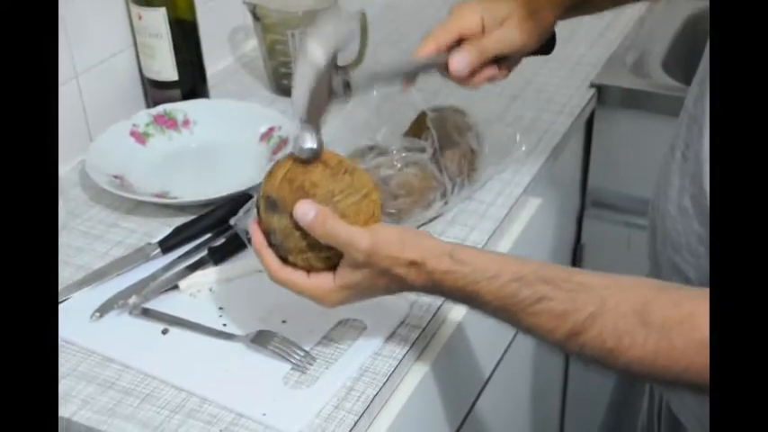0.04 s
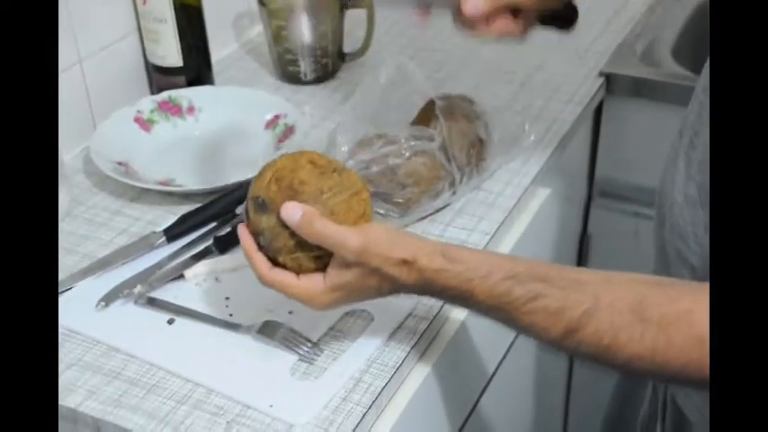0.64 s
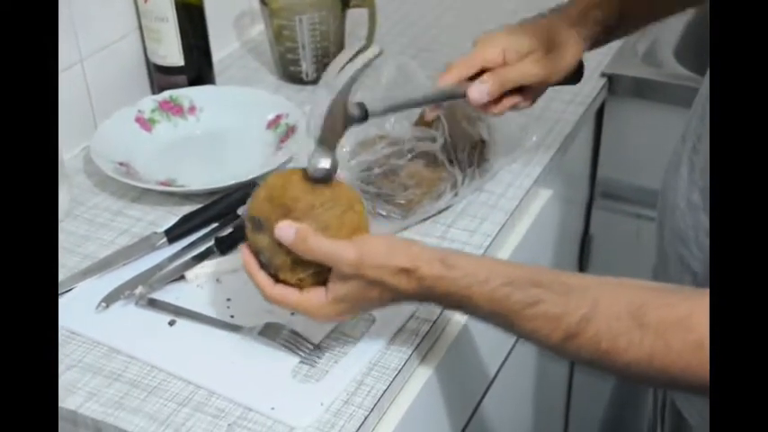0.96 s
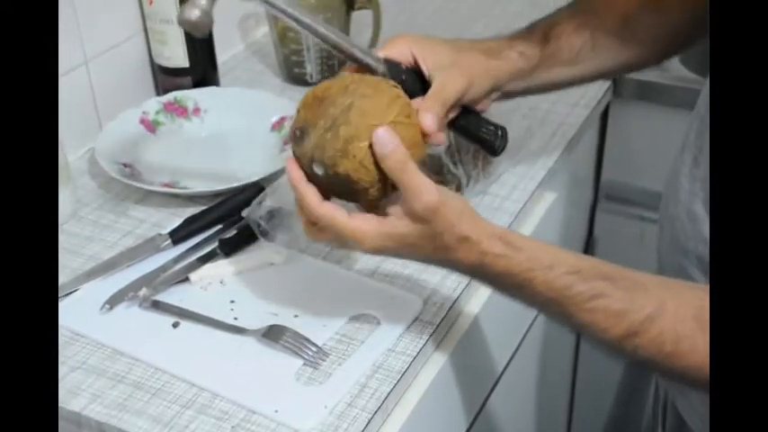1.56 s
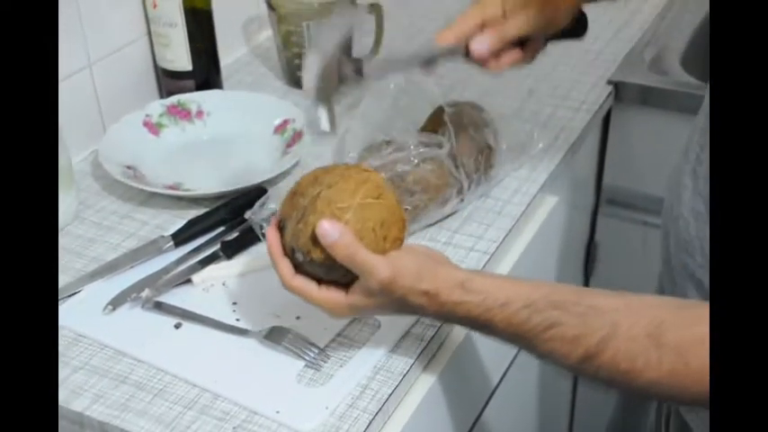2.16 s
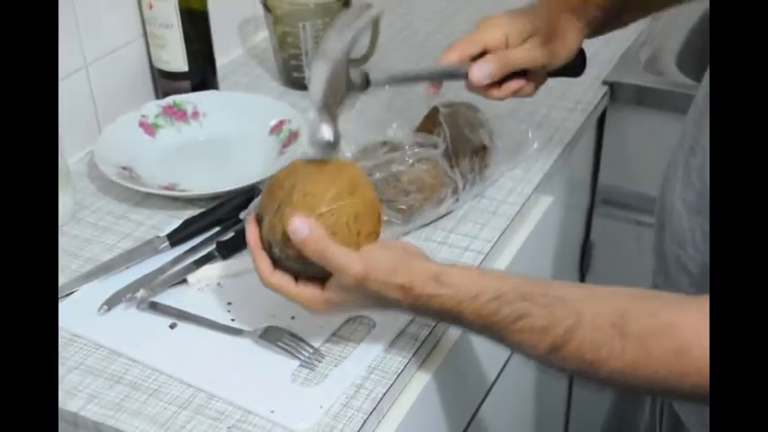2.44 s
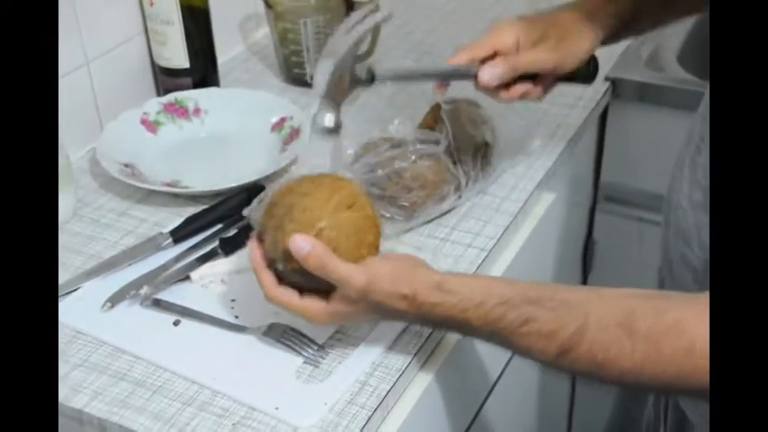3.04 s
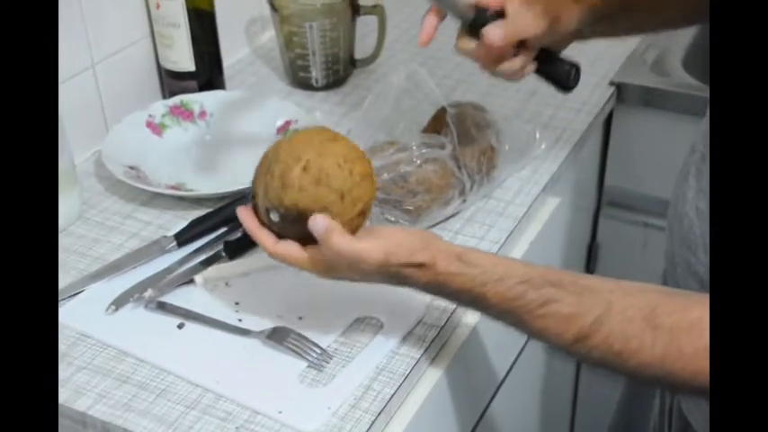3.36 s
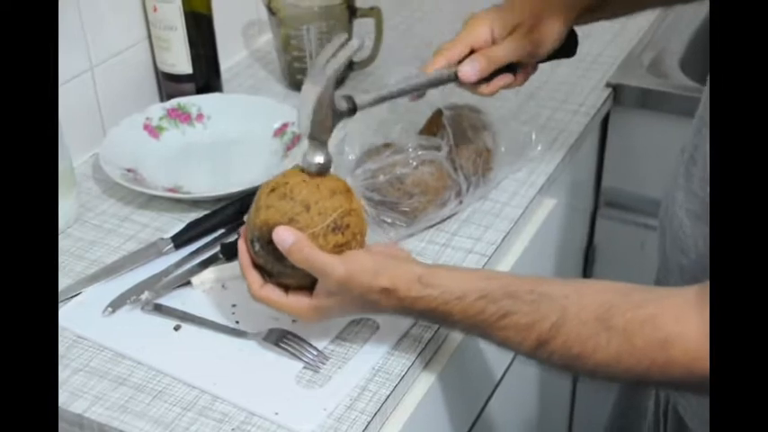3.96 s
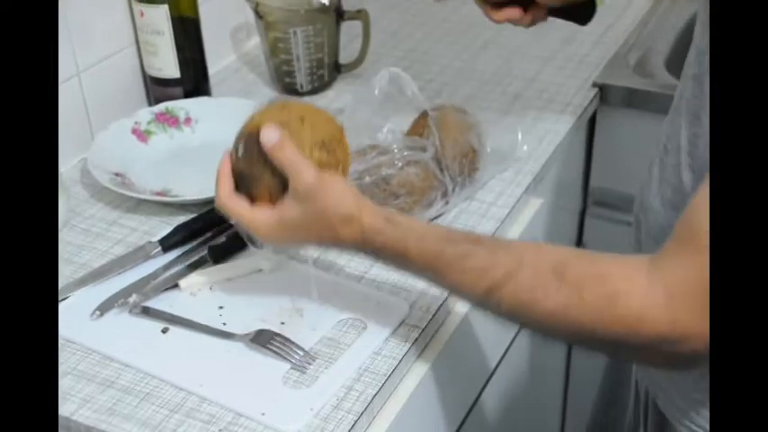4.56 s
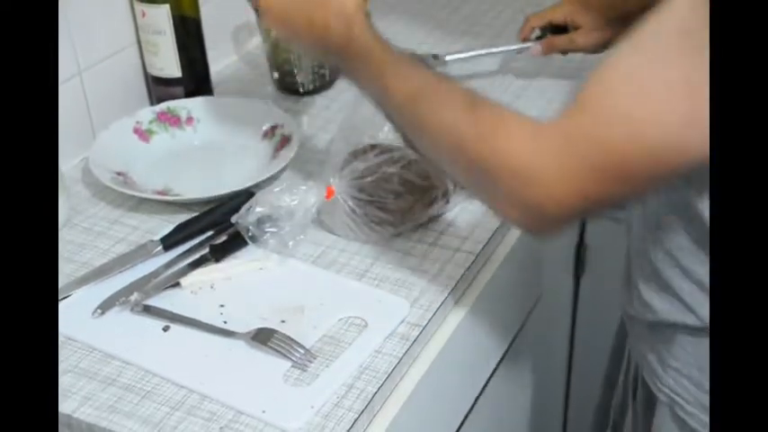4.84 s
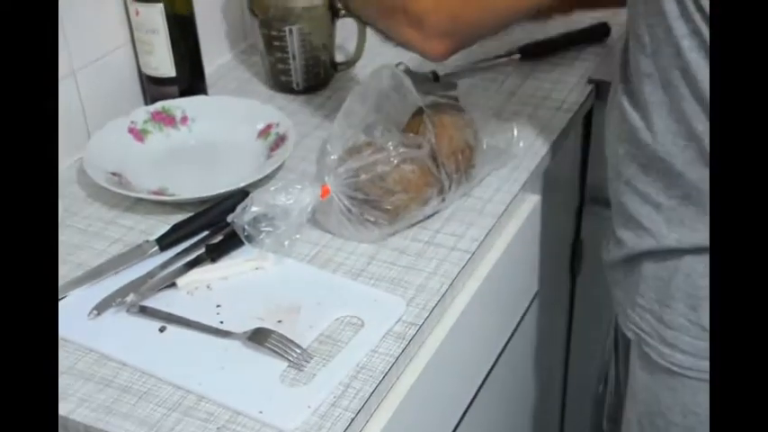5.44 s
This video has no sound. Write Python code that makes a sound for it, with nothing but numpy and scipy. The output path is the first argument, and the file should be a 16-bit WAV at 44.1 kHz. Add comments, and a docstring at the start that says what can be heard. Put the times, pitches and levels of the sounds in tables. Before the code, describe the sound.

A steel hammer strikes a hand-held coconut three times, pauses, strikes three more times, then gives one duller knock. Each blow is a sharp crack with a short hollow ring. Husk and a plastic bag rustle faintly before nut and hammer clatter onto the worktop. An appliance throbs softly in the hard-walled kitchen, and the small, narrow-band microphone overloads on the hardest blows.

```python
"""A hard-walled kitchen. A steel hammer knocks seven times on a hand-held coconut: each blow is a
crack, a hollow ring of the shell and a thump into the palm. Husk and a plastic bag rustle, then nut and
hammer are dumped on the worktop, where the board and a plate ring. An appliance throbs faintly over the
room tone. A small camera's narrow-band microphone hears it all and overloads on the hardest blows."""
import sys
import numpy as np
from scipy import signal
from scipy.fft import rfft, irfft
from scipy.io import wavfile

SR = 44100
rng = np.random.default_rng(int(sys.argv[2]) if len(sys.argv) > 2 else 0)


def unload_wav(signal):
    """Save mono or channel-first audio to the path in sys.argv[1] as 16-bit WAV at rate SR, clipped to [-1, 1]."""
    wavfile.write(
        sys.argv[1],
        SR,
        np.round(np.clip(np.atleast_2d(signal).T, -1, 1) * 32767).astype(np.int16),
    )


N = 247401
AGE = np.arange(SR) / SR  # one second, the life of a blow

# EQ of room tone and microphone hiss: (frequency [Hz], gain [dB])
ROOM_TONE_EQ = [(20, -14), (70, -9.5), (130, -4), (220, 3), (400, 3), (750, -3.5), (1050, -7), (1600, -9),
                (3000, -16), (4800, -14.5), (5400, -24.5)]
# partials of one appliance throb: (frequency [Hz], level [dB], delay [s], length [s])
HUM_PARTIALS = [(379, -44.5, 0, .09), (465, -50, 0, .05), (690, -54, .01, .045)]
# hammer on nut; a square hit clicks harder than a glancing one: (time [s], level [dB], contact
# cut-off [Hz], click [dB], hollow band [Hz], hollow boost [dB], clack band [Hz], push into palm [dB])
HAMMER_HITS = [ (0.066, -22.5, 2760, 11, 934, 10, 2204, -17), (0.4592, -18.5, 4700, 10, 517, 4, 2240, -23),
               (0.909, -19, 4750, 17.5, 580, 7, 2610, -3), (2.0639, -20.5, 4700, 8, 779, 7.5, 3116, 4),
               (2.4380, -19.5, 4900, 19, 618, 11.5, 4200, -8.5),
               (2.9874, -20.5, 5200, 15, 636, 13.5, 2914, -10.5), (3.956, -25, 925, 3, 560, 3, 3055, -5.5)]
# EQ of a hammer hit: (frequency [Hz], gain [dB])
HIT_EQ = [(40, -24), (100, -27), (200, -3.5), (450, 3), (800, 4), (1300, 0), (2500, -2), (4000, -5),
          (5500, -10.5)]
# bright bending modes of the hard shell: (frequency [Hz], level [dB], t60 [s])
CLACK_MODES = [(1020, -8, 0.32), (1313, -9.5, 0.4), (1460, -10.5, 0.42), (1675, -11.5, .35),
               (1980, -3, 0.12), (2237, -3.5, 0.33), (2340, -8.5, 0.16), (2880, -6, 0.2), (2900, -9, 0.21),
               (3117, -8.5, .3), (3564, -11.5, .28), (4043, -11, 0.34), (4700, -7.5, .22)]
# dull give of the hand under the nut: (frequency [Hz], level [dB], t60 [s])
PALM_MODES = [(134, -5, 0.13), (167.8, -1, 0.1), (224.2, -5.5, .18)]
# the whole nut bouncing in the palm: (frequency [Hz], level [dB], t60 [s])
THUMP_MODES = [(274.6, -2.5, 0.15), (303, -9, 0.087), (394.5, -14, 0.42)]
# hollow ring of the shell: (frequency [Hz], level [dB], t60 [s])
SHELL_MODES = [(515.6, -4.5, 0.45), (536, -9.5, 0.42), (583, -4.5, 0.49), (598, -0.5, 0.31),
               (598, -7.5, 0.17), (658, -10, .26), (713, -1, 0.23), (752, -8.5, 0.45)]
# stretches where the fingers turn the nut: (start [s], end [s])
FUMBLE_SPANS = [(1.3, 1.85), (4.3, 5.0)]
# clearest rustles of husk and bag: (time [s], level [dB], length [s], centre [Hz])
CLEAR_RUSTLES = [(1.67, -54.5, 0.048, 4000), (4.519, -52.5, 0.091, 1593), (4.901, -52.5, 0.038, 3460),
                 (5.544, -53, 0.062, 4200)]
# landings on the worktop: (time [s], impact level [dB], contact cut-off [Hz], board ring [dB])
LANDINGS = [(5.0366, -10, 2650, -34.5), (5.138, -18, 1307, -18), (5.189, -30, 965, -17.5),
            (5.2300, -15.5, 1750, -12.5), (5.2440, -17.5, 1160, -32.5), (5.2615, -18, 1100, -21),
            (5.2986, -29, 2470, -25.5)]
# EQ of a landing: (frequency [Hz], gain [dB])
LANDING_EQ = [(40, -18), (110, -18.5), (170, -2.5), (450, -2.5), (850, 5), (1200, 1), (1600, 2),
              (2500, -4.5), (5500, -11)]
# the worktop and the plate standing on it: (frequency [Hz], level [dB], t60 [s])
WORKTOP_MODES = [(173, -8, .3), (242, -11, .36), (388, -12, .3), (495, -8, .33), (630, -10, .33),
                 (719, 1, .35), (790, -4, .3), (872, -4, .22), (938, 1, .22), (1165, -8, .26),
                 (1545, -10, .3), (1599, -21, .95)]


def undb(db):
    """Decibels to gain."""
    return 10 ** (np.asarray(db) / 20)


def fade(t60):
    """Exponential decay that loses 60 dB in t60 seconds."""
    return np.exp(-np.log(1000) * AGE / t60)


def add(out, s, x):
    """Mix x into out from time s on."""
    i = int(max(s, 0) * SR)
    out[i:i + len(x)] += x[:max(len(out) - i, 0)]


def eq(points, hz):
    """Gain at hz of an EQ curve drawn through points."""
    point_hz, db = np.transpose(points)
    return undb(np.interp(np.log(hz + 1), np.log(point_hz), db))


def bell(hz, centre_hz, octaves):
    """Bell curve on a log-frequency axis."""
    return np.exp(-.5 * (np.log2((hz + 1) / centre_hz) / octaves) ** 2)


def noise(size):
    """White noise with random phases, rms 1."""
    return irfft(np.exp(2j * np.pi * rng.random(size // 2 + 1)), size) * np.sqrt(size)


def shape(x, gain):
    """Minimum-phase filter with the response gain(hz), so that attacks stay sharp."""
    size = 2 * len(x)
    cepstrum = irfft(np.log(gain(np.arange(size // 2 + 1) * SR / size) + 1e-6))
    cepstrum[1:size // 2] *= 2
    cepstrum[size // 2 + 1:] = 0
    return irfft(rfft(x, size) * np.exp(rfft(cepstrum)))[:len(x)]


def room_tone(level_db=-53.5):
    """A steady bed of room noise and microphone hiss."""
    hz = np.arange(N // 2 + 1) * SR / N
    bed = irfft(rfft(rng.standard_normal(N)) * eq(ROOM_TONE_EQ, hz), N)
    return undb(level_db) * bed / np.std(bed)


def appliance(period_s=.1598, sag=.13, spinup_s=.013):
    """A low hum that swells, bends up to pitch and dies about six times a second."""
    out = np.zeros(N)
    bent_time = np.cumsum(1 - sag * np.exp(-AGE / spinup_s)) / SR
    for s in np.arange(.003, N / SR, period_s):
        for hz, db, delay, length in HUM_PARTIALS:
            swell = np.sin(np.pi * np.minimum(AGE / length, 1) ** .8)
            pitch = hz * (1 + .008 * rng.standard_normal())
            gain = undb(db + rng.standard_normal())
            add(out, s + delay, gain * swell * np.sin(2 * np.pi * pitch * bent_time))
    return out


def contact(hz, cut_hz, steep, scrape_db):
    """A softer contact lasts longer and excites less treble; a faint scrape always remains."""
    return np.sqrt(1 / (1 + (hz / cut_hz) ** (2 * steep)) + undb(scrape_db) ** 2)


def crack(room_t60, click_db, burst_db, burst_t60, room_db):
    """The transient: a contact click, a noise burst, then the dense echoes of the kitchen."""
    burst = undb(burst_db) * noise(SR) * fade(burst_t60) / np.sqrt(burst_t60)
    burst[0] += undb(click_db) / burst_t60  # the shorter the blow, the harder its click
    echoes = noise(SR) * fade(room_t60) * (1 - fade(.021))
    return burst + undb(room_db) * echoes


def ring(modes, detune=.0043):
    """Decaying sines; every blow lands on another spot and detunes them a little."""
    out = np.zeros(SR)
    for hz, db, t60 in modes:
        pitch = hz * (1 + detune * rng.standard_normal())
        out += undb(db) * fade(t60) * np.sin(2 * np.pi * pitch * AGE)
    return out


def kitchen_reverb(x, wet_db):
    """Walls return a ringing body's tone and make its decay uneven."""
    tail = noise(SR) * fade(.36) * (1 - fade(.022))
    tail /= np.sqrt(np.sum(tail ** 2))
    return x + undb(wet_db) * signal.fftconvolve(x, tail)[:len(x)]


def coconut_knocks(clack_boost_db=4.5, burst_cycles=250, shell_note_hz=633):
    """Each blow cracks on the husk, rings the hollow shell and thumps the nut into the palm."""
    out = np.zeros(N)
    for s, db, cut_hz, click_db, hollow_hz, hollow_db, clack_hz, palm_db in HAMMER_HITS:
        def spot_eq(hz):
            """The struck spot favours one low and one high band of the shell."""
            boost_db = hollow_db * bell(hz, hollow_hz, .22) + clack_boost_db * bell(hz, clack_hz, .12)
            return eq(HIT_EQ, hz) * contact(hz, cut_hz, steep=6.5, scrape_db=-18.5) * undb(boost_db)
        tail_t60 = .42 + .0347 * (db + 19.5)  # stronger blows linger longer
        strike = crack(tail_t60, click_db, burst_db=10.5, burst_t60=burst_cycles / cut_hz, room_db=11.5)
        strike += undb(-2.5) * ring(CLACK_MODES, detune=.004)
        palm = undb(palm_db) * ring(PALM_MODES)
        thump = undb(9.5 + .35 * palm_db) * ring(THUMP_MODES)
        # the shell rings as strongly as the blow feeds its main note
        shell = undb(-11.5) * spot_eq(shell_note_hz) * ring(SHELL_MODES)
        body = (palm + thump + shell) * (1 - fade(.023))  # the heavy nut takes a moment to get moving
        add(out, s, undb(db) * (shape(strike, spot_eq) + kitchen_reverb(body, wet_db=-6.5)))
    return out


def rustle(db, length, centre_hz):
    """A small crinkle of husk fibre or plastic: a quick swell of uneven grains."""
    grains = noise(SR) * undb(7.5 * rng.standard_normal(SR))
    crinkle = shape(grains, lambda hz: bell(hz, centre_hz, octaves=.7))
    rise = AGE / (length / 3)
    swell = rise * np.exp(1 - rise)
    return kitchen_reverb(undb(db) * crinkle / np.std(crinkle) * swell, wet_db=-8.5)


def handling(gap_s=.22):
    """A few clear rustles, and faint ones of varying colour while the nut is turned in the hand."""
    out = np.zeros(N)
    for s, db, length, centre_hz in CLEAR_RUSTLES:
        add(out, s, rustle(db, length, centre_hz))
    for start, end in FUMBLE_SPANS:
        for s in np.arange(start, end, gap_s):
            late_s = rng.random() * gap_s / 2
            centre_hz = 2170 * 2 ** rng.uniform(-.34, .4)
            add(out, s + late_s, rustle(db=-58.5, length=.055, centre_hz=centre_hz))
    return out


def worktop_clatter():
    """The nut lands, then the hammer's head and handle, which rock and settle; board and plate ring."""
    out = np.zeros(N)
    for s, db, cut_hz, ring_db in LANDINGS:
        burst = crack(room_t60=.43, click_db=11.5, burst_db=7, burst_t60=.073, room_db=9.5)
        impact = shape(
            burst, lambda hz: eq(LANDING_EQ, hz) * contact(hz, cut_hz, steep=3.38, scrape_db=-41.5))
        board = undb(ring_db) * ring(WORKTOP_MODES, detune=.0013)
        board *= 1 - fade(.057)  # the wide board blooms slowly
        add(out, s, undb(db) * impact + kitchen_reverb(board, wet_db=-8))
    return out


def overload_ticks(x, wave, edge_hz=9000, limit_db=-14.5, recover_s=.05):
    """The sharpest edges in x overload the camera: three quick spikes kick against the wave's sign."""
    spike = np.array([-.25, .25, 1., .25, -.25])
    edges = np.abs(signal.sosfilt(signal.butter(4, edge_hz, "high", fs=SR, output="sos"), x))
    ticks = np.zeros(N)
    for i in signal.find_peaks(edges, height=undb(limit_db), distance=recover_s * SR)[0]:
        for s in i / SR + np.cumsum(rng.uniform(.0003, .0018, size=3)):
            add(ticks, s, -np.sign(wave[int(s * SR)]) * spike)
    return ticks


def lowpass(x, hz):
    """The camera's steep treble cut."""
    return signal.sosfilt(signal.ellip(10, .2, 62, hz, fs=SR, output="sos"), x)


def scene():
    """The mono mix: hits and handling up front, hum and room tone underneath."""
    return (coconut_knocks() + worktop_clatter() + handling() + appliance() + room_tone())[None]


def record(dry, bass_hz=75, band_hz=5500, top_hz=16500, ceiling=.82, mirror_db=-56):
    """The microphone thins the bass and soft-clips; the camera narrows the band and ticks on overload."""
    thin = signal.sosfilt(signal.butter(2, bass_hz, "high", fs=SR, output="sos"), dry[0])
    rounded = ceiling * np.tanh(lowpass(thin, band_hz) / ceiling)
    narrow = lowpass(rounded, band_hz)
    # the camera's low sampling rate leaves a faint mirror image high in the treble
    mirror = undb(mirror_db) * narrow * np.cos(np.pi / 2 * np.arange(N))
    top_cut = signal.butter(16, top_hz, fs=SR, output="sos")
    return signal.sosfilt(top_cut, narrow + mirror + overload_ticks(thin, narrow))[None]


dry = scene()
out = record(dry)
unload_wav(out)
```